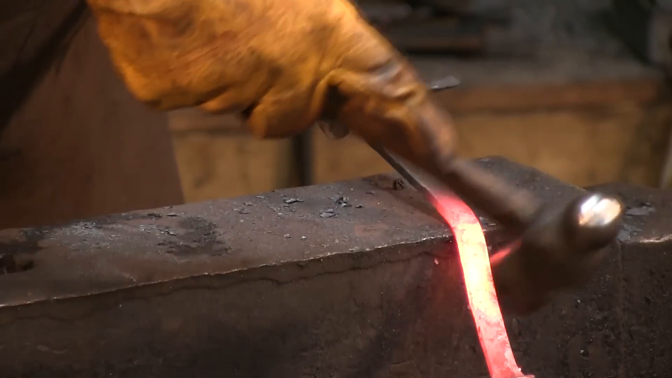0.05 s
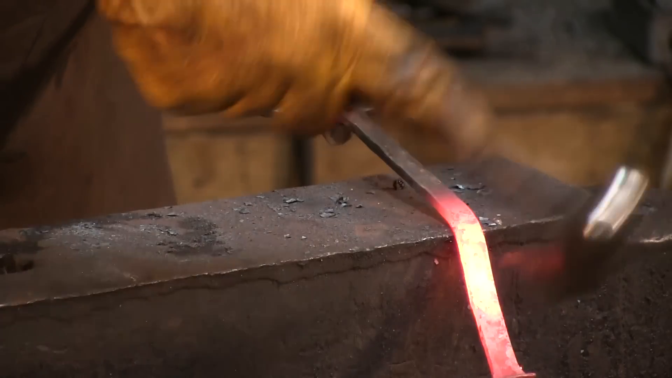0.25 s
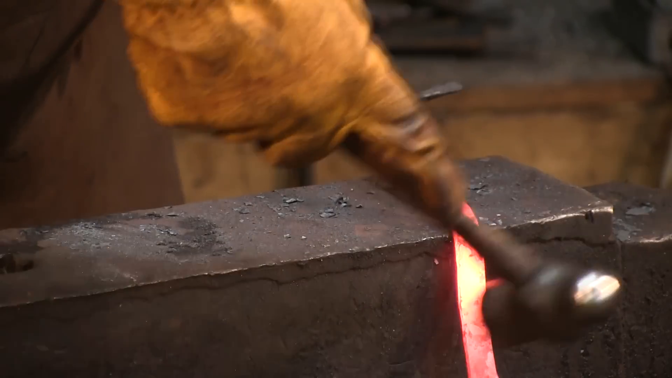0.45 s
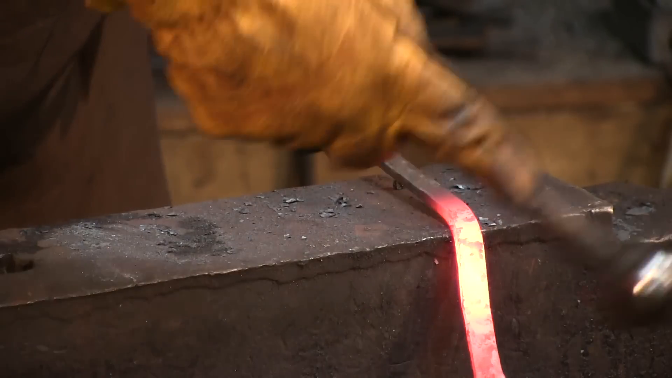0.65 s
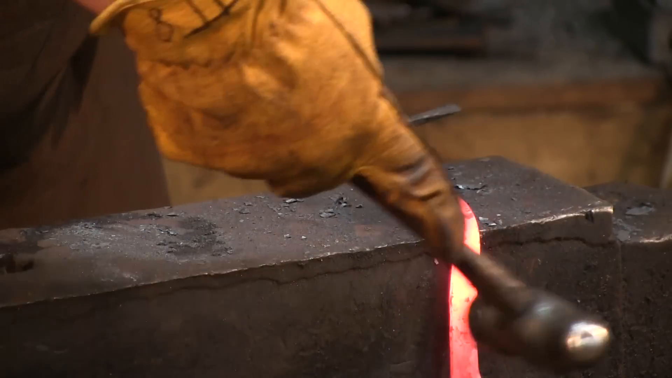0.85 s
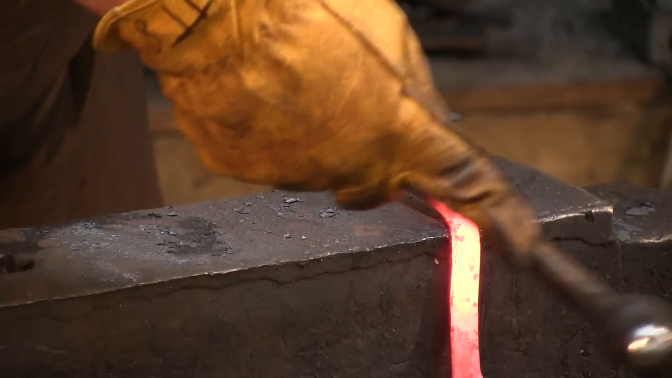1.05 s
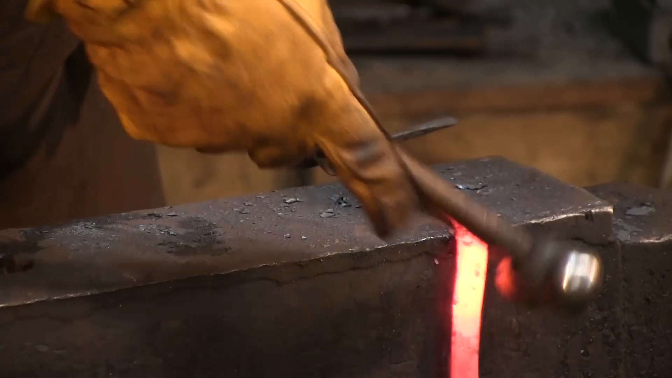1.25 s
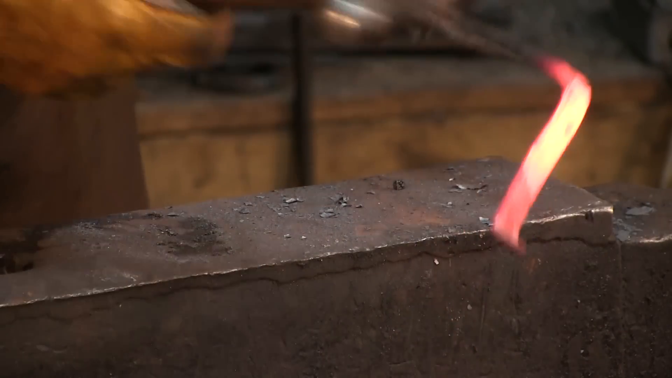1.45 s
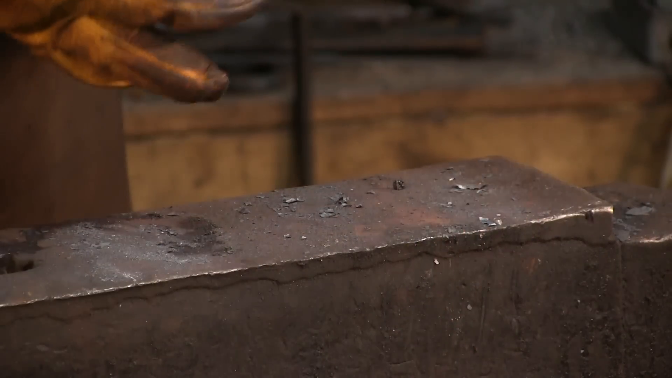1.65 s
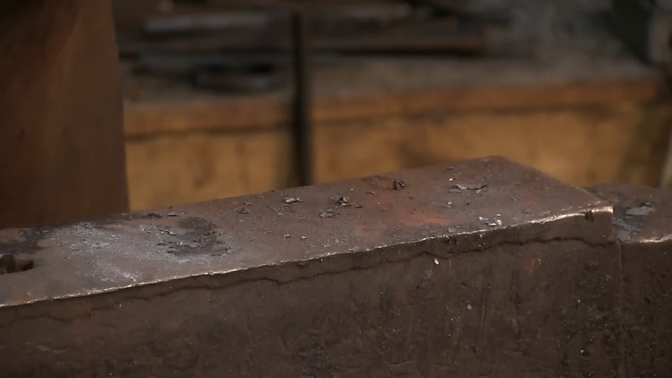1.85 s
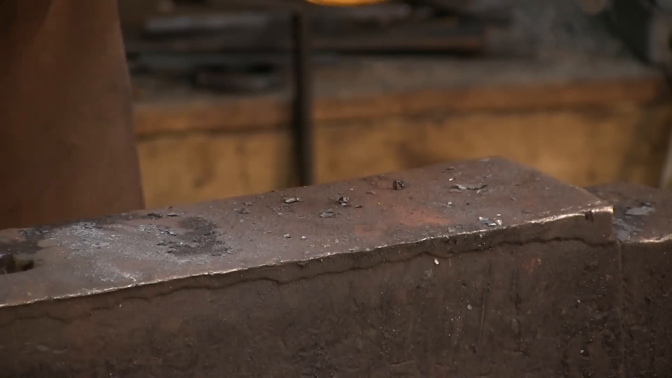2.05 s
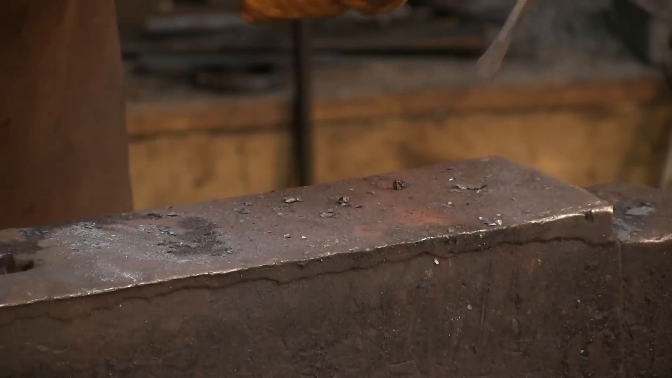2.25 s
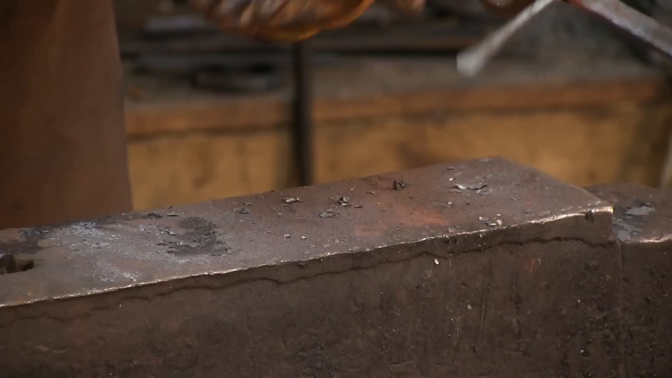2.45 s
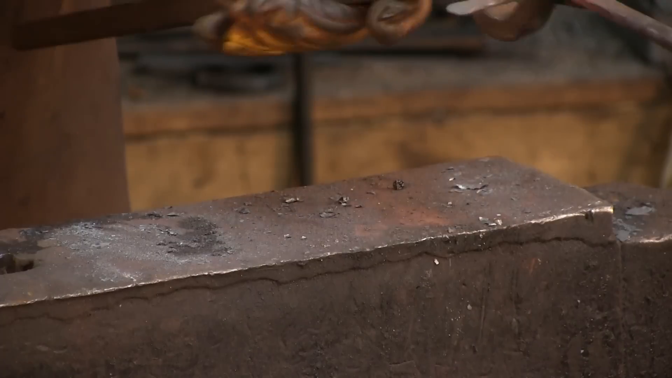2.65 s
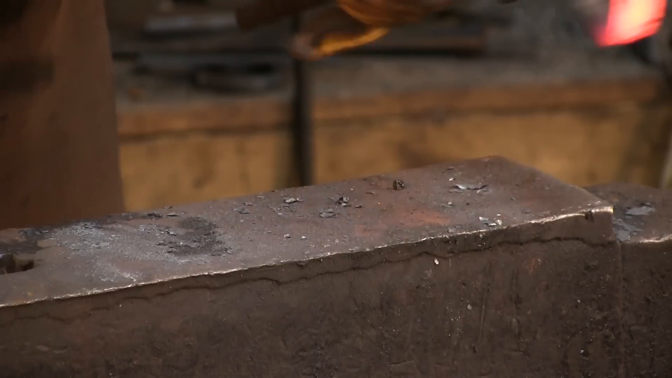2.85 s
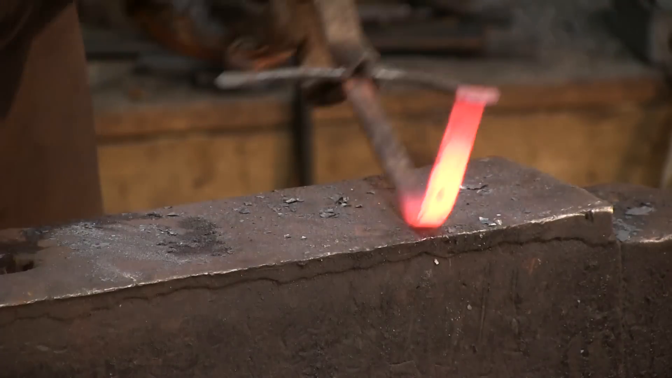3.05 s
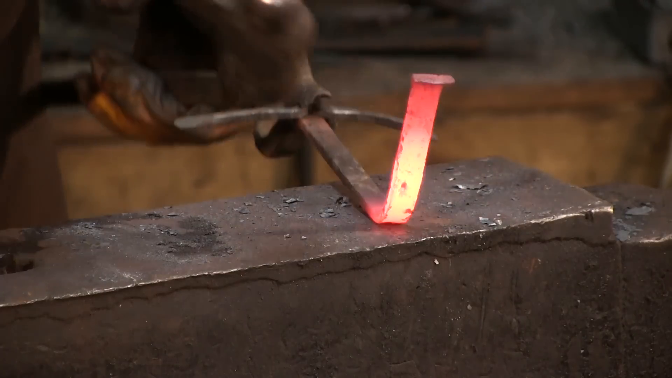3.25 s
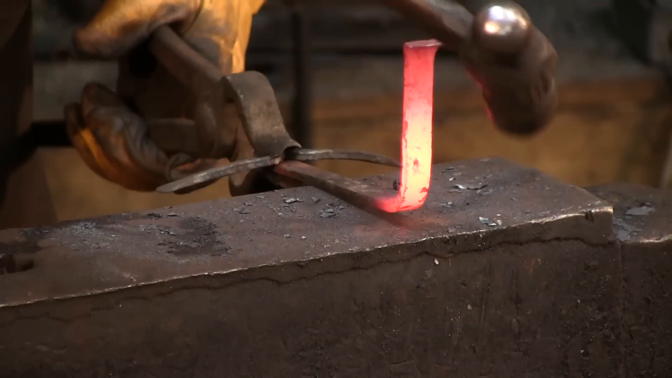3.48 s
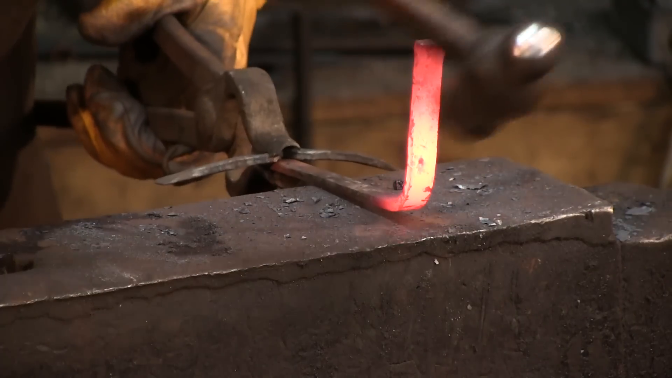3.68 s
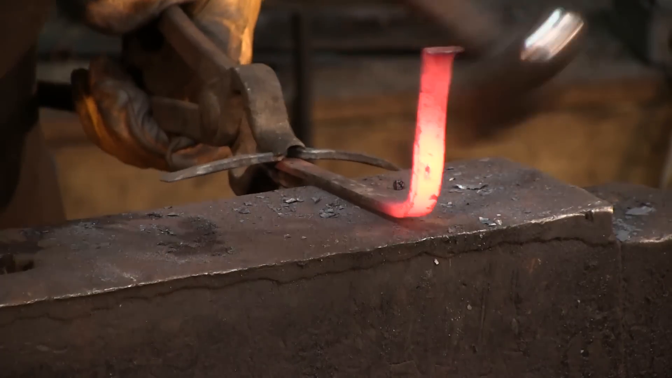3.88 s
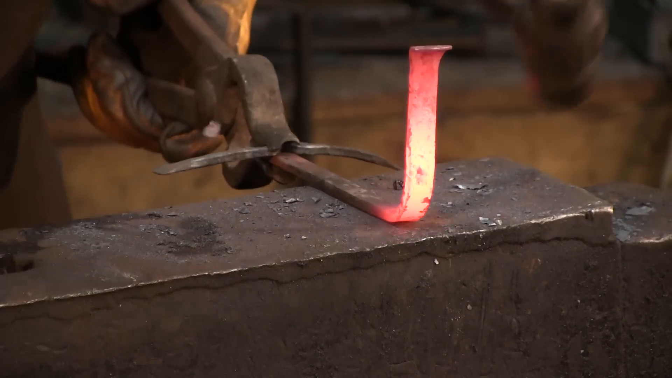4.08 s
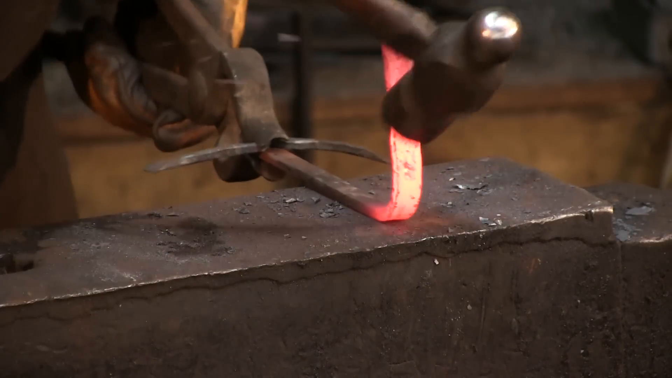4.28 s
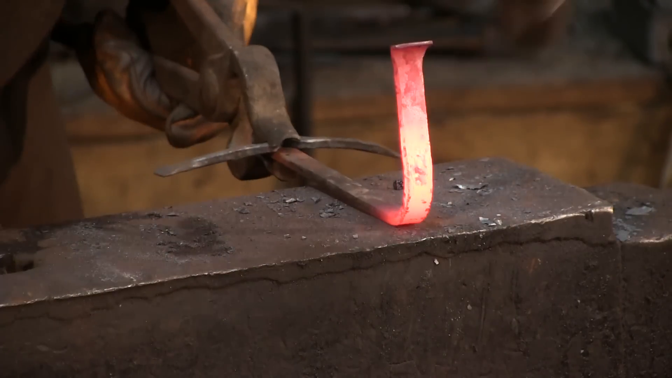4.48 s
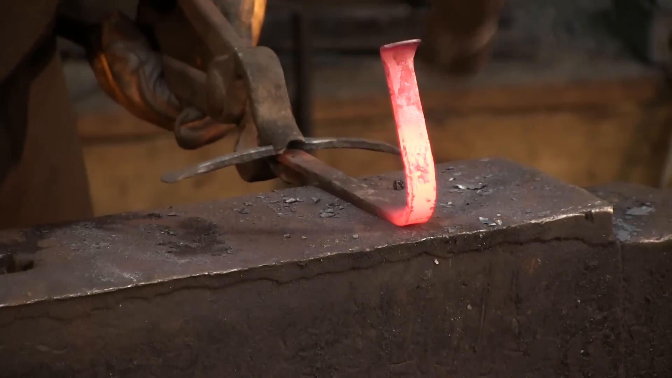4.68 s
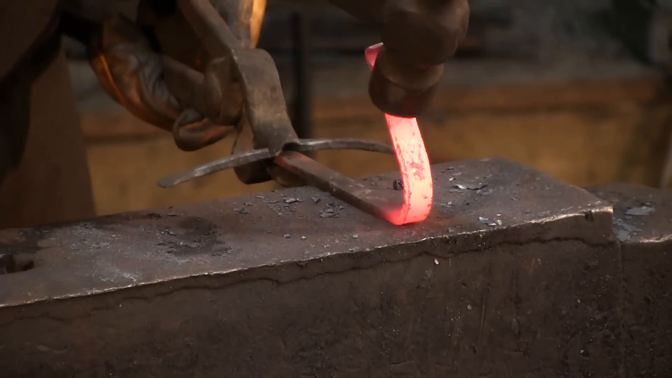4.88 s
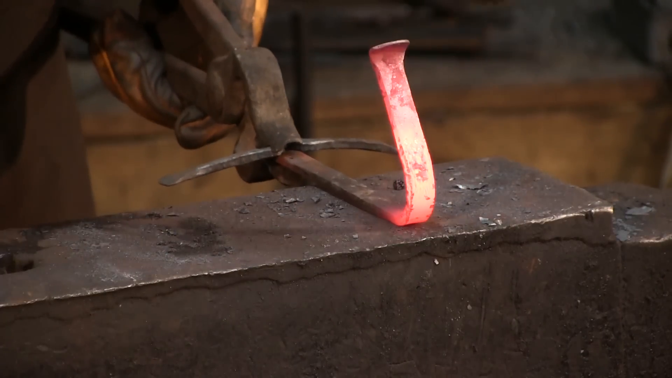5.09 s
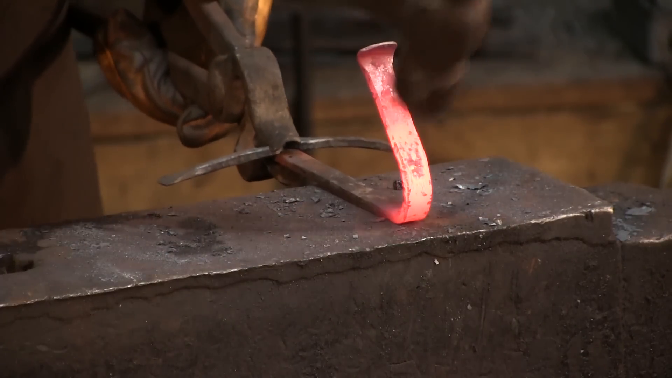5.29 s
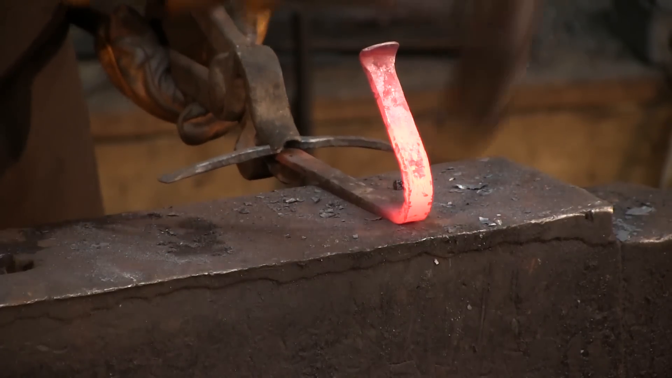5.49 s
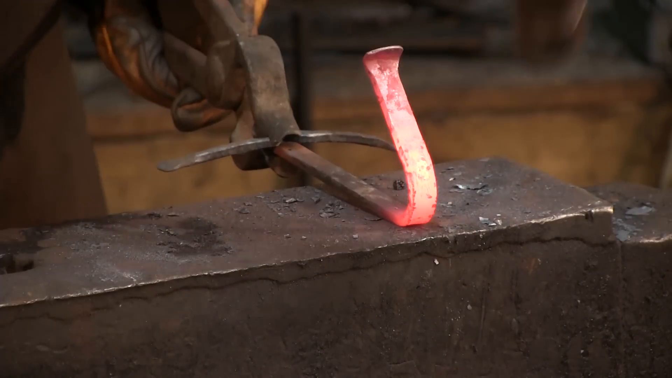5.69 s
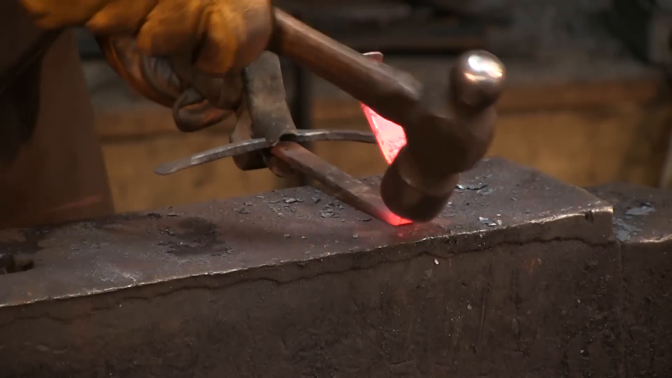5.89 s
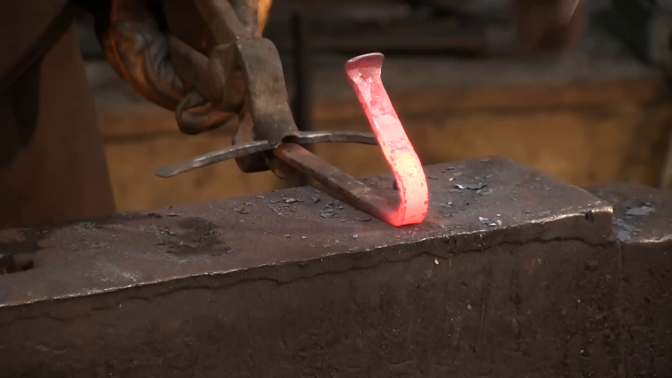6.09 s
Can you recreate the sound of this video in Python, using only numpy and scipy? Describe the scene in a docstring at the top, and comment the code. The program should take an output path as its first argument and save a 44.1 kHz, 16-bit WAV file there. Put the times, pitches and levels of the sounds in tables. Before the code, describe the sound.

A small workshop with low rumble and faint hiss, heard close in mono. Hammer blows on hot steel over an anvil's edge fall at about 0, 0.4, 0.8 and 1.2 seconds: short, bright, heavily damped clacks with a low knock beneath. The first two bounce rapidly; the fourth has a lower clank and a clearer short ring. From 1.5 to 2.9 seconds feet shuffle and thump dully, cloth rustles softly, and a tongs tap clacks at 2.0, with the heaviest thumps near 2.2. From 3.2 to 3.7 light taps and a gritty slide with a thin, falling squeak. A soft blow comes at 3.7, then firm ones at about 4.0, 4.3, 4.7, 5.0, 5.3, 5.6 and 5.95, with deep floor booms, very faint ringing and brief room echoes. These strokes turn brighter and hissier as the metal cools; the last is cut short at the end.

```python
"""A smith bends a hot steel bar over an anvil's edge: four blows, short damped noise clacks, the first two bouncing.
Feet shift and one tongs tap jars the floor (dull noise thumps in a soft shuffle); light taps and rustles fall
between, and the bar slides on the face (grit, squeak). Then eight blows on the upright bar, hissing more as it cools.
Under each blow the anvil rings faintly in decaying sines, its stand knocks and the floor booms. A small workshop
answers clacks and taps with decaying noise; low rumble and faint hiss run throughout."""
import sys
import numpy as np
from scipy import signal
from scipy.fft import rfft, irfft, next_fast_len
from scipy.io import wavfile
from scipy.ndimage import uniform_filter1d, map_coordinates

SR = 44100
rng = np.random.default_rng(int(sys.argv[2]) if len(sys.argv) > 2 else 0)


def transcribe(signal):
    """Save signal, clipped to [-1, 1], as a 16-bit WAV file at the path in sys.argv[1]."""
    frames = np.atleast_2d(signal).T
    limited = np.clip(frames, -1, 1)
    pcm = np.round(limited * 32767).astype(np.int16)
    wavfile.write(sys.argv[1], SR, pcm)


N = 270333
AGE = np.arange(SR) / SR  # time since a contact [s]
HZ = np.fft.rfftfreq(SR, 1 / SR) + 1  # bins of a one-second sound, offset 1 Hz to allow logs

# hammer blows, relative levels: t/s, clack/dB, room echo re clack/dB, clank pitch f/Hz, anvil ring/dB,
# push/dB, stand knock/dB, floor boom/dB
BLOWS = [(-0.004, -26.5, -6, 3950, -67, -41, -36, -28), (0.4059, -24.5, -7.5, 3950, -66, -36.5, -32, -32.5),
         (0.83, -27, -5.5, 3930, -68.5, -36, -42.5, -43.5), (1.2398, -27, -4.5, 2410, -42, -34, -35, -38.5),
         (3.725, -41, -9, 4030, -70, -60, -39.5, -33.5),
         (4.031, -25.5, -5, 4600, -69.5, -38.5, -37.5, -26.5),
         (4.3411, -24.5, -4.5, 5270, -65, -32.5, -35, -23),
         (4.667, -27.5, -7.5, 5700, -69.5, -27.5, -37, -28.5),
         (4.99, -31, -8, 6760, -67, -37.5, -37, -25.5), (5.3006, -30.5, -7, 5800, -69, -38, -44, -25.5),
         (5.643, -29, -6, 5700, -61.5, -33, -30.5, -24.5),
         (5.952, -31, -2.5, 5630, -60.5, -35, -29.5, -31.5)]
# stand and floor knock spectrum: f/Hz, relative density/dB
KNOCK_SPECTRUM = [(40, -8), (110, 2.5), (190, 4), (290, -9), (480, -10), (750, -25), (1300, -40),
                  (4000, -54), (9000, -100)]
# floor boom spectrum: f/Hz, relative density/dB
BOOM_SPECTRUM = [(12, -44), (30, -6.5), (48, 4), (62, 2), (85, -11.5), (130, -25), (220, -30), (600, -97)]


def amp(db):
    """Decibels to gain."""
    return 10 ** (np.asarray(db) / 20)


def unit(x):
    """Scale to rms 1."""
    return x / np.sqrt(np.mean(x ** 2) + 1e-20)


def pulse(x):
    """Scale to the energy of 10 ms at rms 1."""
    return x / np.sqrt(np.sum(x ** 2) / (SR * 0.01) + 1e-20)


def along(points, hz):
    """Interpolate (f/Hz, value) points on a log-frequency axis."""
    f, v = np.transpose(points)
    return np.interp(np.log(hz + 1), np.log(f), v)


def noise(spectrum, size, colour_db=0):
    """Gaussian noise shaped by a (f/Hz, dB) spectrum plus extra colour, rms 1."""
    hz = np.fft.rfftfreq(size, 1 / SR)
    gain = amp(along(spectrum, hz) + colour_db)
    return unit(irfft(rfft(rng.standard_normal(size)) * gain, size))


def wobble(rate_hz, size):
    """Smooth random curve, rate_hz knots per second."""
    knots = rng.standard_normal(400)
    return map_coordinates(knots, [np.arange(size) * rate_hz / SR], mode="mirror")


def swell(peak_s, steep):
    """Envelope rising to 1 at peak_s, then dying away."""
    u = AGE / peak_s
    return (u * np.exp(1 - u)) ** steep


def resonance(centre_hz, octaves):
    """Bell over frequency, 1 at its centre; half width in octaves."""
    return 1 / (1 + (np.log2(HZ / centre_hz) / octaves) ** 2)


def add(track, s, x):
    """Mix x into the track at time s, cropped to the track."""
    start = round(s * SR)
    x = x[max(-start, 0):N - start]
    track[max(start, 0):][:len(x)] += x


def hold(s):
    """How the bar lies at time s: first bent over the edge, then upright on the face."""
    # each: clack pitch f/Hz, body pitch f/Hz, relative body level/dB, place (0 face, 1 edge)
    over_edge = (6400, 900.5, -34.5, 0.9)
    upright = (9000, 560, -38.5, 0.22)
    turned_s = 2.5
    return over_edge if s < turned_s else upright


def contacts(count=2):
    """Every hammer touch: a blow's columns plus loss/dB; the still straight bar springs back, so it bounces."""
    springy_until_s = 0.6
    bounce_s, bounce_shrink, bounce_loss_db = 0.0115, 0.5, 12
    rows = []
    for s, *blow in BLOWS:
        rows.append((s, *blow, 0))
        if s < springy_until_s:
            delays_s = np.cumsum(bounce_s * bounce_shrink ** np.arange(count))
            rows += [(s + delay_s, *blow, bounce_loss_db) for delay_s in delays_s]
    return rows


def workshop(x, gather_s=0.0053):
    """Room answer from steady noise: echoes gather, then each band decays at its own rate."""
    # reverberation: f/Hz, t60/s
    walls = [(300, 0.42), (1000, 0.31), (3000, 0.34), (7000, 0.3), (15000, 0.28)]
    hz, t, z = signal.stft(x, SR, nperseg=256)
    decay = amp(-60 * t / along(walls, hz)[:, None])
    tail = signal.istft(z * decay, SR, nperseg=256)[1][:SR]
    # the first echoes come singly, the late ones merge
    flutter_db = 4 * wobble(390, size=SR) * np.exp(-AGE / 0.025)
    return pulse(tail * amp(flutter_db) * (1 - np.exp(-AGE / gather_s)))


def clack(spectrum, colour_db, echo_db):
    """Contact noise of a few ms plus the room's answer in the same colour."""
    envelope = swell(0.0021, 2.8) + 0.23 * swell(0.0031, 1.9)
    direct = pulse(envelope * noise(spectrum, SR, colour_db))
    return direct + amp(echo_db) * workshop(noise(spectrum, SR, colour_db))


def hammer(cluster_db=2.4):
    """Hammer, bar and tongs clack in dense, heavily damped resonances that shift with every contact."""
    # main clack spectrum: f/Hz, relative density/dB
    clack_spectrum = [(1500, -48), (3500, -5), (5200, 0.5), (7500, 2.5), (10000, 0.5), (11500, -19),
                      (16000, -22.5)]
    # body spectrum: f/Hz, relative density/dB
    body_spectrum = [(250, -7), (600, 4), (1000, 2), (1400, 1.5), (2400, 1), (4000, 0), (6000, -31.5),
                     (12000, -57.5)]
    # sizzle spectrum: f/Hz, relative density/dB
    sizzle_spectrum = [(7000, -18), (10500, -8.5), (12300, -9), (13500, -11.5), (15700, -21)]
    # a blow that drives the bar firmly onto the anvil rings more and has more body
    usual_ring_db, body_db_per_ring_db = -65.5, 0.4055
    # the cooling, hardening bar sizzles more and its clack tilts upward
    cools_from_s, sizzle_start_db, sizzle_db_per_s = 4.0, -9, 5.5
    tilt_db_per_octave_per_s = 2.5
    out = np.zeros(N)
    for s, db, echo_db, clank_hz, ring_db, *_, loss_db in contacts():
        pitch_hz, body_hz, body_db, _ = hold(s)
        colour_db = cluster_db * wobble(220.6, size=len(HZ))  # random curve over frequency
        colour_db = colour_db + 5 * resonance(pitch_hz, 0.28)
        colour_db = colour_db + 6 * resonance(clank_hz, 0.1) + 5 * resonance(body_hz, 0.17)
        firm_db = body_db_per_ring_db * (ring_db - usual_ring_db)
        cooled_s = max(s - cools_from_s, 0)
        tilt_db = tilt_db_per_octave_per_s * cooled_s * np.log2(1 + HZ / 2000)
        sizzle_db = db + sizzle_start_db + sizzle_db_per_s * cooled_s
        blow = amp(db) * clack(clack_spectrum, colour_db + tilt_db, echo_db)
        blow += amp(body_db + firm_db) * clack(body_spectrum, colour_db, echo_db)
        blow += amp(sizzle_db) * clack(sizzle_spectrum, colour_db, echo_db)
        add(out, s, amp(-loss_db) * blow)
    return out


def anvil(ring_db=6.0, waver_db=3.0):
    """Decaying sine modes weighted by the blow's place; wall echoes make them waver, and swell or dip."""
    # mode pitch: f/Hz
    mode_hz = [1514, 1581, 3035, 3625, 5141, 5226, 6688, 9932, 10960, 14180]
    # mode level struck on the face: relative level/dB
    mode_face_db = [10, -1, -14, -11.5, 2, 2, -10.5, -2.5, -13, -13]
    # mode level struck at the edge: relative level/dB
    mode_edge_db = [-4.5, 10, -7.5, 6.5, -19, 1, -3, -37, -13.5, -40.5]
    # mode decay: t60/s
    mode_t60_s = [0.44, .35, 0.44, 0.24, 0.88, 0.35, 0.67, .85, .5, .65]
    # signed share of each mode returned by the walls: amplitude ratio
    mode_echo = [0, 0.4, 0, 3.8, 0, 0.5, -0.5, -0.5, -0.5, 0]
    modes = list(zip(mode_hz, mode_face_db, mode_edge_db, mode_t60_s, mode_echo))
    returning = swell(0.079, 5.2)
    attack = 1 - np.exp(-AGE / 0.00092)
    out = np.zeros(N)
    for s, _, _, _, db, *_ in BLOWS:
        *_, place = hold(s)
        ring = np.zeros(SR)
        for hz, face_db, edge_db, t60_s, echo in modes:
            mode_db = face_db + np.clip(place, 0, 1) * (edge_db - face_db)
            mode_db = mode_db + waver_db * wobble(15, size=SR)
            phase = rng.uniform(0, 2 * np.pi) + 0.5 * wobble(28, size=SR)
            envelope = amp(mode_db - 60 * AGE / t60_s) * (1 + echo * returning)
            ring += envelope * np.sin(2 * np.pi * hz * AGE + phase)
        add(out, s, amp(db + ring_db) * ring * attack)
    return out


def stand(push_s=0.00089):
    """The anvil is pushed down as a whole, its stand knocks, and the floor's boom builds up after it."""
    stand_hz, stand_upper_hz = 191, 466.6
    # a harder knock also stirs the upper resonance
    usual_knock_db, upper_db_per_knock_db = -37, 1.22
    bounce_knock_share = 0.41  # share of the bounce loss that the knock suffers
    u = AGE / push_s
    push = pulse(u * (2 - u) * np.exp(-u))  # one swing out and back
    knock = 2.0 * swell(0.0044, 0.92) + swell(0.022, 1.2) + 0.13 * swell(0.066, 2.0)
    boom = 0.5 * swell(0.0041, 1.3) + swell(0.054, 4.5) + 0.059 * swell(0.33, 1.2)
    out = np.zeros(N)
    for s, *_, push_db, knock_db, boom_db, loss_db in contacts():
        upper_db = 2.5 + upper_db_per_knock_db * (knock_db - usual_knock_db)
        colour_db = 9 * resonance(stand_hz, 0.11) + upper_db * resonance(stand_upper_hz, 0.18)
        knock_noise = pulse(knock * noise(KNOCK_SPECTRUM, SR, colour_db))
        boom_noise = pulse(boom * noise(BOOM_SPECTRUM, SR))
        add(out, s + 0.0011, amp(push_db - loss_db) * push)
        add(out, s, amp(knock_db - bounce_knock_share * loss_db) * knock_noise)
        add(out, s, amp(boom_db - loss_db - 2.0) * boom_noise)
    return out


def taps(echo_db=-7):
    """Tongs, bar and scale touch lightly: resonant clacks without anvil ring."""
    # light taps: t/s, level/dB, pitch f/Hz
    touches = [(1.9816, -37.5, 2110), (2.305, -58, 1920), (3.14, -63, 2700), (3.2007, -53.5, 4800),
               (3.686, -64.5, 7040), (5.394, -59.5, 3850)]
    # tongs spectrum: f/Hz, relative density/dB
    tongs_spectrum = [(250, -6), (700, -0.5), (2500, 0.5), (4000, -6.5), (8000, -5), (11000, -17),
                      (16000, -27)]
    tongs_hz = 1120  # lowest resonance of the tongs
    # lower-pitched contacts are softer, so duller: dB/octave of tilt per octave below even_hz
    even_hz, dulling = 4700, 9.2
    out = np.zeros(N)
    for s, db, pitch_hz in touches:
        dull_db_per_octave = dulling * np.log2(even_hz / pitch_hz)
        colour_db = 9 * resonance(pitch_hz, 0.22) + 9 * resonance(tongs_hz, 0.12)
        colour_db = colour_db - dull_db_per_octave * np.log2(1 + HZ / 2000)
        add(out, s, amp(db) * clack(tongs_spectrum, colour_db, echo_db))
    return out


def floor_thumps():
    """Feet shift and one tongs tap jars the floor: dull thumps, each inside a soft shuffle."""
    # thumps: t/s, relative knock level/dB, relative boom level/dB
    thumps = [(1.47, -41.5, -42), (1.807, -49.5, -56), (1.846, -44.5, -41.5), (1.981, -33.5, -30.5),
              (2.11, -36.5, -30.5), (2.196, -32, -21.5), (2.231, -31, -24), (2.253, -23, -27.5),
              (2.322, -36, -35), (2.466, -54, -35.5), (2.579, -38.5, -40.5), (2.754, -36, -34.5),
              (2.873, -46, -40.5), (3.214, -40, -47)]
    # shuffle spectrum: f/Hz, relative density/dB
    shuffle_spectrum = [(100, -31), (200, 9), (350, -3), (620, 0.5), (950, -18.5), (3000, -24),
                        (14000, -35)]
    # the shuffle surrounds each thump, louder for a heavier one
    usual_shuffle_db, shuffle_s, usual_thump_db, shuffle_db_per_thump_db = -65, 0.07, -40, 0.3848
    out, shuffle = np.zeros(N), np.zeros(N)
    t = np.arange(N) / SR
    floor_db = 9 * resonance(155, 0.22) + 6 * resonance(630, 0.07)
    for s, knock_db, boom_db in thumps:
        knock = pulse(swell(0.0077, 0.82) * noise(KNOCK_SPECTRUM, SR, floor_db))
        boom = pulse(swell(0.018, 0.93) * noise(BOOM_SPECTRUM, SR))
        add(out, s, amp(knock_db - 3.5) * knock)
        add(out, s, amp(boom_db + 6) * boom)
        shuffle_db = usual_shuffle_db + shuffle_db_per_thump_db * (knock_db - usual_thump_db)
        shuffle += amp(shuffle_db) * np.exp(-((t - s) / shuffle_s) ** 2)
    return out + shuffle * amp(3.5 * wobble(35.025, size=N)) * noise(shuffle_spectrum, N)


def scrape():
    """The bar slides over loose scale on the face: rough noise plus a thin squeak falling in pitch."""
    # slides: t/s, time to release/s, grit level/dB, initial squeak f/Hz
    slides = [(3.247, 0.227, -68.5, 7800), (3.469, 0.16, -60, 7700), (3.678, 0.016, -68, 7050)]
    # grit spectrum: f/Hz, relative density/dB
    grit_spectrum = [(400, 10), (1500, -5), (4000, -4), (7000, -3.5), (8500, -7), (11000, -11.5),
                     (16000, -21)]
    attack_s, release_s, squeak_re_grit_db, sag_hz_per_s = 0.0072, 0.03, -9, 1500
    out = np.zeros(N)
    for s, length_s, db, squeak_hz in slides:
        stroke = np.interp(AGE, [0, attack_s, length_s, length_s + release_s], [0, 1, 1, 0])
        roughness = unit(uniform_filter1d(rng.standard_normal(SR), size=130))
        grit = unit(amp(2.3 * roughness) * noise(grit_spectrum, SR))
        pitch_hz = (squeak_hz - sag_hz_per_s * AGE) * (1 + 0.012 * roughness)
        squeak = amp(squeak_re_grit_db) * np.sin(2 * np.pi * np.cumsum(pitch_hz) / SR)
        add(out, s, amp(db) * stroke * (grit + squeak))
    return out


def rustles():
    """Gloves and apron brush softly as the smith moves: short noise swells."""
    # rustles: t/s, level/dB
    brushes = [(1.66, -66), (2.16, -67), (2.439, -63.5), (2.82, -71)]
    # cloth spectrum: f/Hz, relative density/dB
    cloth_spectrum = [(2000, -24), (6000, 0), (9500, 2), (13000, -11), (16000, -12)]
    out = np.zeros(N)
    for s, db in brushes:
        add(out, s, amp(db) * pulse(swell(0.013, 1.6) * noise(cloth_spectrum, SR)))
    return out


def background(air_db=-56, drift_db=1.64):
    """The workshop's low rumble and faint hiss: shaped noise of slightly drifting level."""
    # air spectrum: f/Hz, relative density/dB
    air_spectrum = [(12, -24.5), (20, 8), (116, 1), (177, -9), (301, -11.5), (399, -18.5), (485, -16.5),
                    (642, -18), (780, -21), (873, -22.5), (1330, -25), (1860, -26), (6540, -32),
                    (16000, -43)]
    return amp(air_db + drift_db * wobble(3.565, size=N)) * noise(air_spectrum, N)


def scene():
    """Sum of all sources, one channel."""
    forging = hammer() + anvil() + stand()
    handling = taps() + floor_thumps() + rustles() + scrape()
    return (forging + handling + background())[None]


def record(dry):
    """Steep low-pass at the recorder's band limit."""
    top_hz = 15900
    size = next_fast_len(N + SR)
    hz = np.fft.rfftfreq(size, 1 / SR)
    low_pass = 1 / (1 + (hz / top_hz) ** 120)
    return irfft(rfft(dry, size) * low_pass, size)[:, :N]


dry = scene()
out = record(dry)
transcribe(out)
```